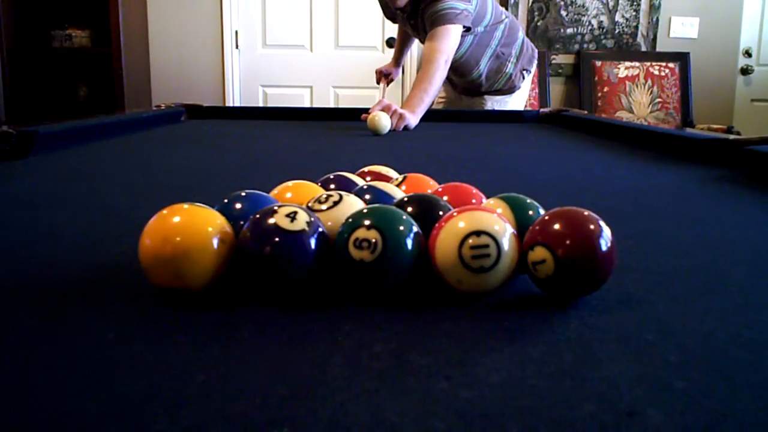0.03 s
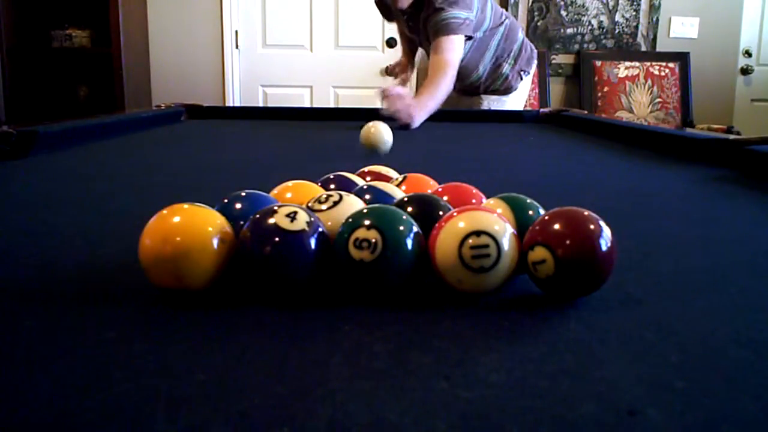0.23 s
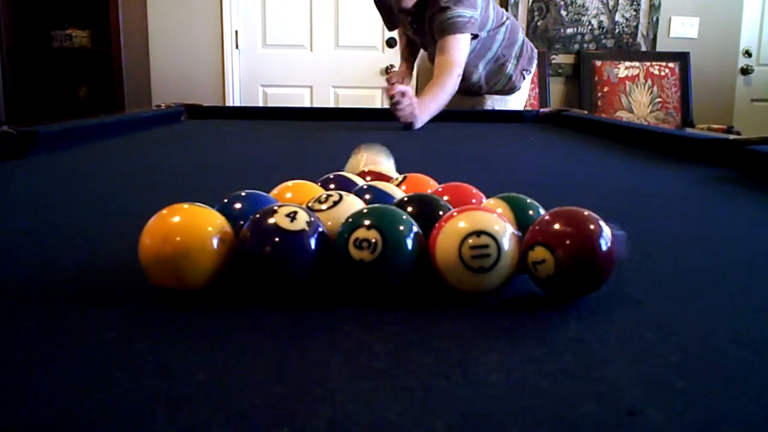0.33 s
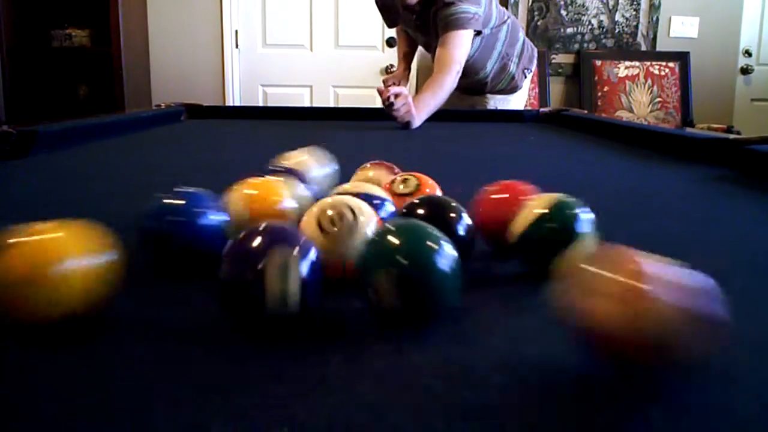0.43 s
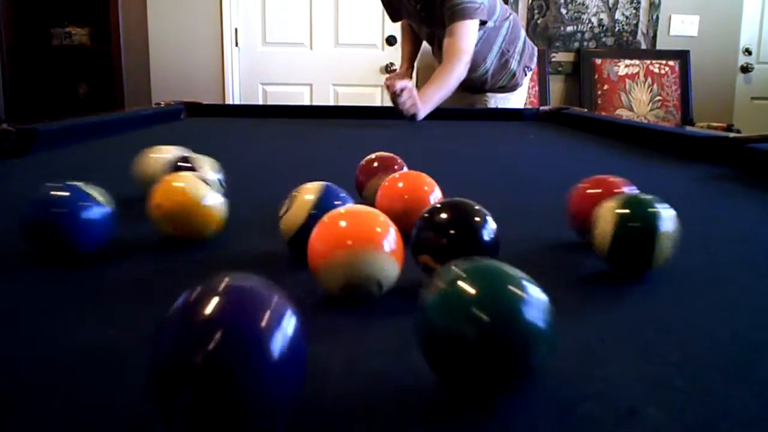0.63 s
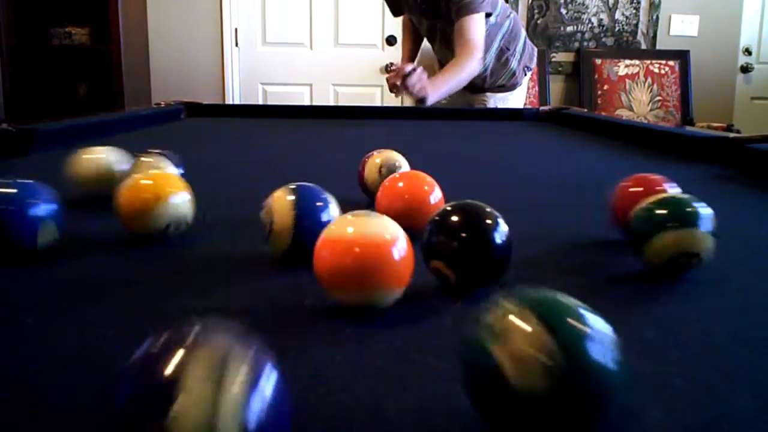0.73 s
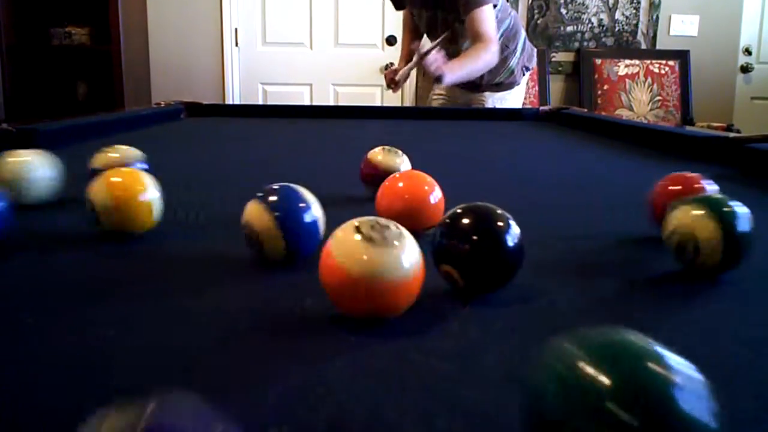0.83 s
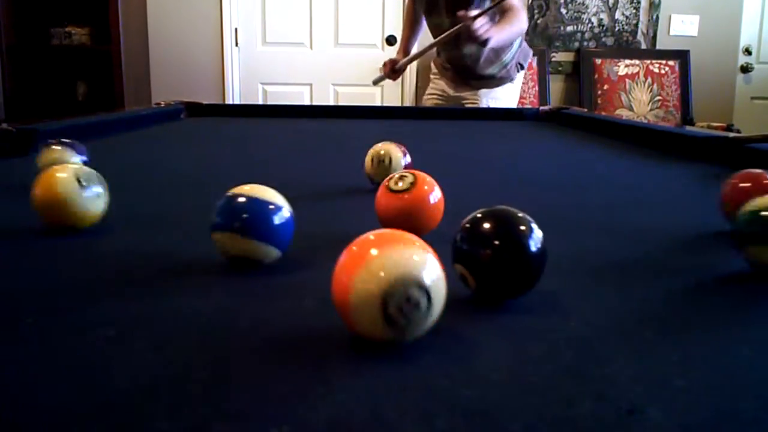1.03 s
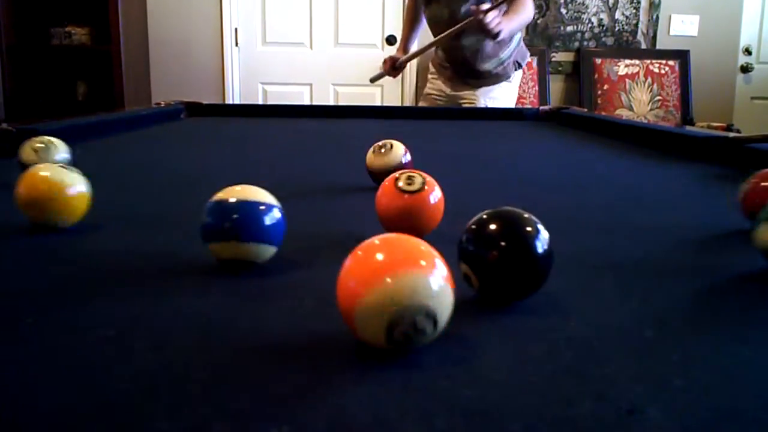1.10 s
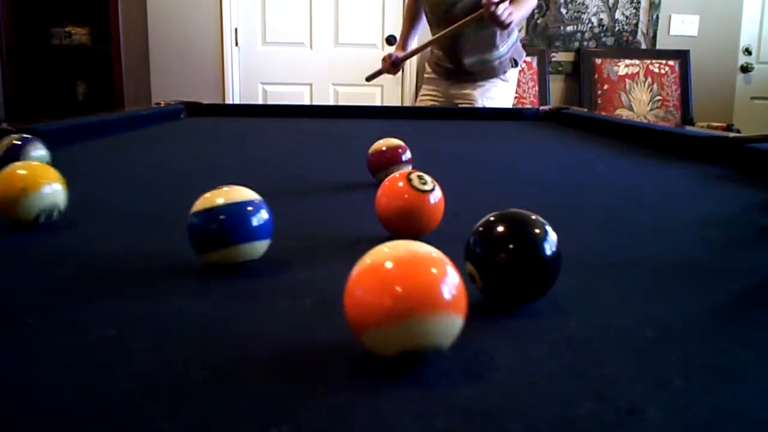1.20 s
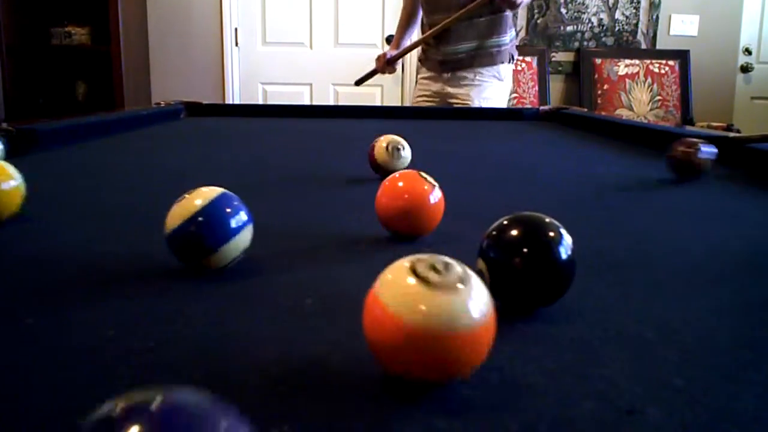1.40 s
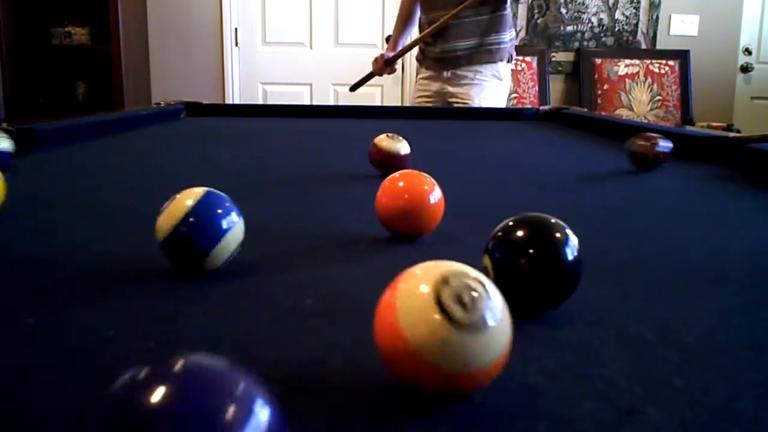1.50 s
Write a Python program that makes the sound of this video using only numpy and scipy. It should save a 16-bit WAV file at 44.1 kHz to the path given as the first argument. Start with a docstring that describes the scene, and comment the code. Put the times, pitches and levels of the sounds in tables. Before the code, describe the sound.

Racked pool balls burst apart with a sharp, slightly distorted crack just after the knock of a cue. Clacks and dull cushion thumps fade to faint rolling, then one clear click sounds near the microphone in a small, reflective room.

```python
"""A small, live room, at the foot of a pool table: the break.
The cue knocks the cue ball, which hops down the cloth and cracks into the rack, overloading the
microphone. Balls roll apart, knock on the rails and thump into the cushions, ringing the table;
two click together close by. Each blow is a short pulse followed by the room's reflections;
rolling, shaft rattle, ticks and room tone are shaped noise."""
import sys
import numpy as np
from scipy import signal
from scipy.fft import rfft, irfft
from scipy.io import wavfile
from scipy.ndimage import uniform_filter1d, minimum_filter1d

SR = 44100
rng = np.random.default_rng(int(sys.argv[2]) if len(sys.argv) > 2 else 0)


def unload_audio(sound):
    """Save the sound as a 16-bit wav file, at the path given as the first command line argument."""
    columns = np.transpose(np.atleast_2d(sound))
    # keep every value between -1 and 1, then stretch to whole-number steps
    steps = np.round(np.clip(columns, -1, 1) * 32767)
    wavfile.write(sys.argv[1], SR, steps.astype(np.int16))


N = 68355

# the rack's crack, its early echoes and further sharp clacks: t/s, level/dB, length/s, pulse gap/s
CRACK_AND_ECHOES = [(.4145, 7, .0050, .00037), (.4236, -2, .0019, 0.00029), (.4350, -9.5, .0022, 0.00049),
                    (.4380, -3, .0017, 0.001), (.4404, -6, .0012, 0.001), (.4600, -0.5, .0015, .00044),
                    (.4625, -4, .0018, 0.00045)]
# ball-on-ball click, direct spectrum: f/Hz, level/dB
CLICK_DIRECT = [(40, -45), (200, -26.5), (500, -17.5), (1300, -9), (1900, 1), (2800, 0), (3450, -11),
                (4100, -29.5), (5200, -24.5), (10000, -38), (15000, -45)]
# rack, spectrum into the room: f/Hz, level/dB
RACK_TO_ROOM = [(40, -48.5), (140, -30.5), (220, -19), (330, -13), (500, -12), (700, -4), (950, -0.5),
                (1150, -4.5), (1350, 1), (1550, 0), (1830, 4.5), (1980, -0.5), (2300, 4.5), (2480, 1.5),
                (2780, 8), (3150, -7.5), (3900, -7), (4700, -23.5), (7500, -38), (15000, -39)]
PULSE_FADE_DB_PER_S, PULSE_SPREAD_DB, JITTER_GAPS = 698, 3.5, .09
CEILING_ECHO_S = .0195


def rack_crack(max_pulses=20):
    """The rack's crack, early echoes and further clacks, each a fused train of clicks; the room rings."""
    out, click = np.zeros(N), pulse(CLICK_DIRECT)
    for start, db, length, gap in CRACK_AND_ECHOES:
        for k, (jitter, spread) in enumerate(rng.standard_normal((max_pulses, 2))):
            gate = np.clip(length / gap - k, 0, 1)
            gain = amp(db - PULSE_FADE_DB_PER_S * k * gap + PULSE_SPREAD_DB * spread)
            add(out, start + gap * (k + JITTER_GAPS * jitter), gate * gain * click)
    impact_s, sent = CRACK_AND_ECHOES[0][0], pulse(RACK_TO_ROOM)
    add(out, impact_s, amp(12) * reverb(sent, build_s=.014))
    add(out, impact_s + CEILING_ECHO_S, amp(10) * reverb(sent, build_s=.003))
    return out


# cue on cue ball: t/s, level/dB, pitch ratio
CUE_HITS = [(.2099, -2, 1.0)]
# cue spectra, direct and into the room: f/Hz, level/dB
CUE_DIRECT = [(40, -30.5), (150, -17.5), (350, -9), (900, 1), (1700, -18.5), (2300, -7.5), (3000, -24.5),
              (6000, -46.5), (15000, -62.5)]
CUE_TO_ROOM = [(40, -27.5), (150, -17), (240, -10), (320, 10), (1000, 6.5), (1800, -4.5), (3400, -6.5),
               (4500, -12), (5700, -17), (6800, -27), (15000, -53)]


def cue_knock():
    """The cue strikes the cue ball once."""
    return blows(CUE_HITS, CUE_DIRECT, CUE_TO_ROOM, room_db=1, build_s=.006)


# single ball-on-ball contacts: t/s, level/dB, pitch ratio
CLICK_HITS = [(.4470, -7, 1.0), (.4820, -14, .9), (.5826, -19.5, 1.1), (1.3075, -5.5, 1.0)]
# click, spectrum into the room: f/Hz, level/dB
CLICK_TO_ROOM = [(40, -40.5), (300, -23.5), (800, -16), (1300, -9.5), (1800, 0), (2600, -8.5), (3400, -18),
                 (4200, -35), (7000, -43), (15000, -48.5)]


def ball_clicks():
    """Pairs of balls collide in single hard contacts."""
    return blows(CLICK_HITS, CLICK_DIRECT, CLICK_TO_ROOM, room_db=-8, build_s=.022)


# balls on rails and bed: t/s, level/dB, pitch ratio
KNOCK_HITS = [(.4146, 0, 1.3), (.4197, -12, 1.1), (.5070, -23, 1.2), (.5835, -13, 0.96),
              (1.0900, -49.5, 1.27), (1.0985, -50.5, 0.94), (1.2995, -46, 1.0)]
# knock spectrum: f/Hz, level/dB
KNOCK_SPECTRUM = [(40, -40.5), (150, -22.5), (400, 3), (700, 5), (980, 3), (1400, -6.5), (2500, -21),
                  (6000, -47), (15000, -55)]


def rail_knocks():
    """Balls knock on the wooden rails and the table bed."""
    return blows(KNOCK_HITS, KNOCK_SPECTRUM, KNOCK_SPECTRUM, room_db=-10.5, build_s=.012)


# balls hitting cushions or shoving the table: t/s, level/dB, pitch ratio, ring/dB re level
THUMP_HITS = [(.4200, -23, 0.63, -7), (0.466, -26, 0.7, 14.5), (.5070, -7, .9, -7),
              (0.557, -17.5, 0.88, -8), (0.5829, -32, 1.1, 1.5), (0.759, -43, 0.98, 9),
              (1.089, -52, 0.77, -14), (1.111, -51.5, 0.84, -5), (1.228, -52.5, 0.86, -18),
              (1.27, -55, 1.05, -14), (1.3076, -41, 0.67, -2), (1.5060, -53.5, 0.81, -10)]
# thump spectrum: f/Hz, level/dB
THUMP_SPECTRUM = [(40, -47.5), (130, -27.5), (260, -3), (400, 11), (560, 12), (800, -4), (1300, -30),
                  (2500, -35), (6000, -59.5), (15000, -77)]
# table modes: f/Hz, level/dB, T60/s
TABLE_MODES = [(110, -43.5, .35), (192, -28, .3), (220.8, -18, 0.57), (325, -29.5, 0.6), (402, -29, 0.47),
               (450, -28.5, 0.55)]


def cushion_thumps():
    """Soft, dull blows set the table ringing."""
    out, t = np.zeros(N), np.arange(SR // 2) / SR
    ring = sum(amp(db - 60 * t / t60) * np.sin(2 * np.pi * hz * t) for hz, db, t60 in TABLE_MODES)
    for start, db, pitch, ring_db in THUMP_HITS:
        push = pulse(THUMP_SPECTRUM, pitch)
        add(out, start, amp(db) * in_room(push, push, room_db=-5.5, build_s=.012))
        add(out, start, amp(db + ring_db) * ring)
    return out


# cue ball landings: t/s, level/dB, pitch ratio
HOP_HITS = [(.2855, -11, 1.09), (.3105, -21, 1.04), (.3465, -20.5, 0.71), (.3690, -33.5, 1.2),
            (.3990, -18, 1.05), (.4030, -18.5, 0.74)]
# landing spectrum: f/Hz, level/dB
HOP_SPECTRUM = [(40, -46), (200, -26.5), (380, -6.5), (520, 2.5), (620, -5.5), (760, -7), (1000, -16.5),
                (1400, -24.5), (2500, -45.5), (15000, -68)]


def cue_ball_hops():
    """The cue ball bounces on the slate on its way to the rack."""
    return blows(HOP_HITS, HOP_SPECTRUM, HOP_SPECTRUM, room_db=-2.5, build_s=.012)


# shaft rattle spectrum: f/Hz, level/dB
RATTLE_SPECTRUM = [(500, -45), (2200, -7), (3400, 8.5), (4600, -4.5), (5700, -3.5), (6800, -17),
                   (15000, -30)]


def shaft_rattle(start_s=.2176, level_db=-26.5, t60_s=.072):
    """The cue shaft rattles briefly after the stroke."""
    envelope, t = np.zeros(N), np.arange(SR // 5) / SR
    add(envelope, start_s, amp(level_db - 60 * t / t60_s))
    return envelope * noise(RATTLE_SPECTRUM)


# rolling envelope: t/s, level/dB
ROLL_LEVELS = [(0.209, -31.5), (.26, -44.5), (.41, -48.5), (0.548, -35.5), (0.701, -54), (.9, -68.5),
               (1.248, -63), (1.55, -68.5)]
# rolling spectrum: f/Hz, level/dB
ROLL_SPECTRUM = [(30, -7.5), (60, 1.5), (100, 7.5), (150, -2), (208, 7), (270, -6), (420, -1.5), (650, -3),
                 (1100, -8), (2500, -18.5), (8000, -42)]


def rolling():
    """Balls rumble on cloth-covered slate."""
    times, db = np.transpose(ROLL_LEVELS)
    t = np.arange(N) / SR
    envelope = amp(np.interp(t, times, db)) * (t > times[0])
    return envelope * noise(ROLL_SPECTRUM)


# dry ticks: t/s, level/dB
TICK_HITS = [(0.5822, -51.5), (0.76, -60), (1.092, -59.5), (1.2580, -60.5)]
# tick spectrum: f/Hz, level/dB
TICK_SPECTRUM = [(500, -15), (4000, -5), (7000, -3), (9500, -8), (15000, -18)]


def ticks(t60_s=.014):
    """Faint, bright scuffs among the moving balls."""
    envelope, t = np.zeros(N), np.arange(SR // 10) / SR
    for start, db in TICK_HITS:
        add(envelope, start, amp(db - 60 * t / t60_s))
    return envelope * noise(TICK_SPECTRUM)


# room tone spectrum: f/Hz, relative density/dB
ROOM_TONE_SPECTRUM = [(30, -46), (80, -31.5), (130, -19), (195, -9.5), (250, -16.5), (310, -17),
                      (490, -16.5), (575, -10), (700, -17.5), (1100, -16.5), (1400, -21), (1670, -11.5),
                      (1850, -20.5), (3500, -23), (16000, -39)]


def room_tone(level_db=-67):
    """Steady, faint noise of the room."""
    return amp(level_db) * noise(ROOM_TONE_SPECTRUM)


# room decay: f/Hz, T60/s
ROOM_DECAY = [(80, .5), (250, 0.34), (600, 0.51), (1800, 0.5), (2800, 0.45), (4000, 0.42), (6000, .34),
              (9000, 0.53), (14000, 0.53)]


def reverb(sound, build_s, delay_s=.002, size=512):
    """Diffuse reflections build up, then die band by band; each spot on the table has its own."""
    hz, t, bands = signal.stft(rng.choice([-1., 1.], SR), SR, nperseg=size)
    decay = amp(-60 * t / lookup(ROOM_DECAY, hz)[:, None])
    _, tail = signal.istft(bands * decay, SR, nperseg=size)
    tail *= np.clip((np.arange(len(tail)) / SR - delay_s) / build_s, 0, 1)
    return signal.fftconvolve(sound, tail / np.linalg.norm(tail))


# first reflections off rails and walls: delay/s, level/dB
REFLECTIONS = [(.0031, -16.5), (.0054, -21), (.0091, -22), (.0098, -16.5)]


def in_room(direct, sent, room_db, build_s):
    """A direct blow, plus first reflections and reverberation of what it sends into the room."""
    equal_energy = sent * np.linalg.norm(direct) / np.linalg.norm(sent)
    out = amp(room_db) * reverb(equal_energy, build_s)
    add(out, 0, direct)
    for delay, db in REFLECTIONS:
        add(out, delay, amp(db) * sent)
    return out


def blows(hits, direct_spectrum, sent_spectrum, room_db, build_s):
    """Short, hard contacts in the room; a shorter contact sounds higher."""
    out = np.zeros(N)
    for start, db, pitch in hits:
        direct, sent = pulse(direct_spectrum, pitch), pulse(sent_spectrum, pitch)
        add(out, start, amp(db) * in_room(direct, sent, room_db, build_s))
    return out


def pulse(spectrum, pitch=1, size=4096):
    """Minimum-phase pulse with this spectrum, peak 1."""
    hz = abs(np.fft.fftfreq(size, 1 / SR))
    log_gain = np.log(amp(lookup(spectrum, hz / pitch)))
    response = np.exp(signal.hilbert(log_gain).conj())
    wave = np.fft.ifft(response).real[:size // 2]
    return wave / abs(wave).max()


def noise(spectrum):
    """Steady noise with this spectrum, rms 1."""
    gain = amp(lookup(spectrum, np.fft.rfftfreq(N, 1 / SR)))
    shaped = irfft(rfft(rng.standard_normal(N)) * gain, N)
    return shaped / shaped.std()


def lookup(table, hz):
    """Interpolates on a log-frequency axis."""
    freqs, values = np.transpose(table)
    return np.interp(np.log(hz + 1), np.log(freqs), values)


def amp(db):
    """Decibels to gain."""
    return 10 ** (np.asarray(db) / 20)


def add(mix, start_s, sound):
    """Mixes a sound in at start_s."""
    part = mix[max(round(start_s * SR), 0):][:len(sound)]
    part += sound[:len(part)]


def scene():
    """Cue, hopping cue ball, rack, scattering balls and room tone, in mono."""
    strikes = cue_knock() + cue_ball_hops() + ball_clicks() + rail_knocks()
    mix = strikes + shaft_rattle() + rack_crack() + cushion_thumps() + ticks() + rolling() + room_tone()
    return mix[None]


LIMIT_DB, RECOVERY_DB_PER_S, SMOOTH_SAMPLES, CLIP_LEVEL = -1, 3998.5, 17, .68
LOW_CUT_HZ, HIGH_CUT_HZ = 190, 16000


def record(dry):
    """Overload: a very fast limiter and soft clipping flatten the crack; low and high cuts follow."""
    x = dry[0]
    fall_db = np.arange(N) / SR * RECOVERY_DB_PER_S
    level_db = 20 * np.log10(abs(x) + 1e-9)
    peak_db = np.maximum.accumulate(level_db + fall_db) - fall_db  # decaying peak hold
    gain_db = minimum_filter1d(np.minimum(LIMIT_DB - peak_db, 0), SMOOTH_SAMPLES)
    limited = x * amp(uniform_filter1d(gain_db, SMOOTH_SAMPLES))
    clipped = limited / (1 + (limited / CLIP_LEVEL) ** 6) ** (1 / 6)
    low_cut = signal.butter(2, LOW_CUT_HZ, "high", fs=SR, output="sos")
    high_cut = signal.firwin(255, HIGH_CUT_HZ, window=("kaiser", 9), fs=SR)
    return signal.oaconvolve(signal.sosfilt(low_cut, clipped), high_cut, "same")[None]


dry = scene()
out = record(dry)
unload_audio(out)
```